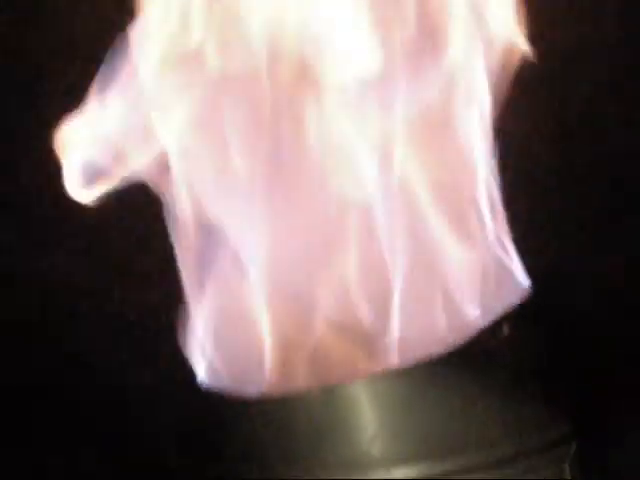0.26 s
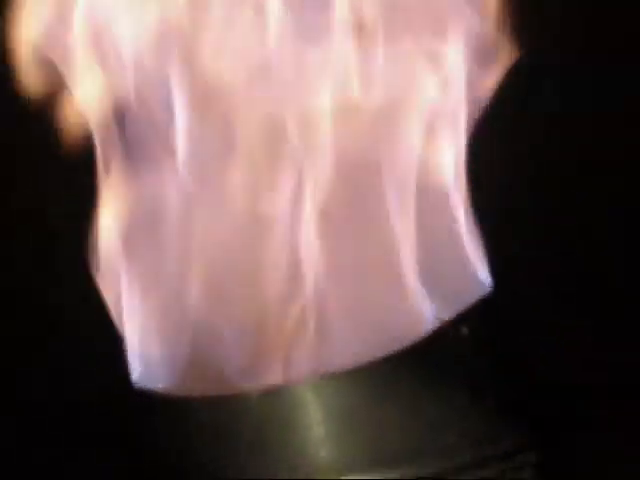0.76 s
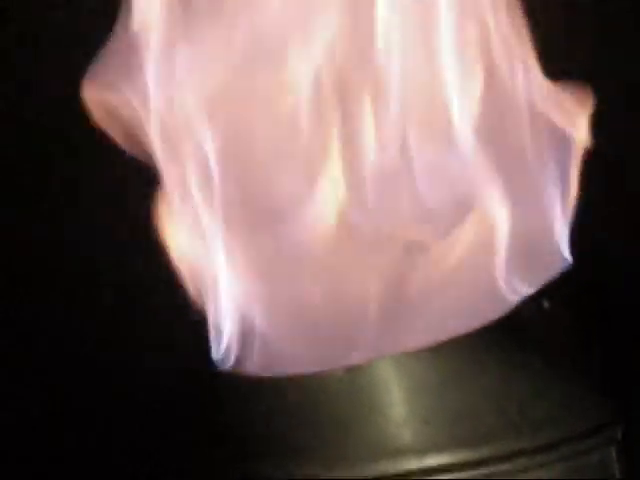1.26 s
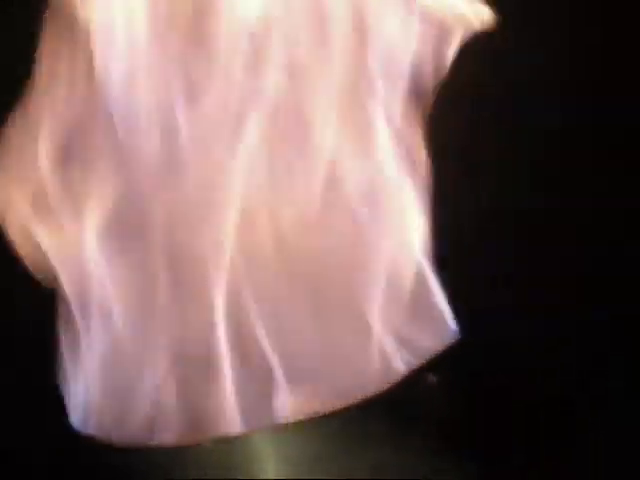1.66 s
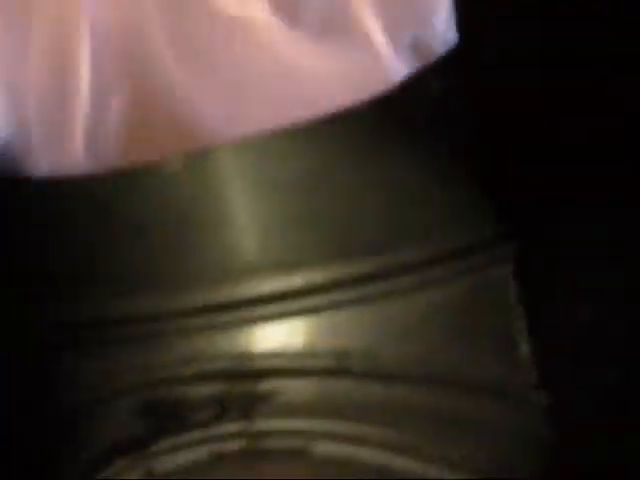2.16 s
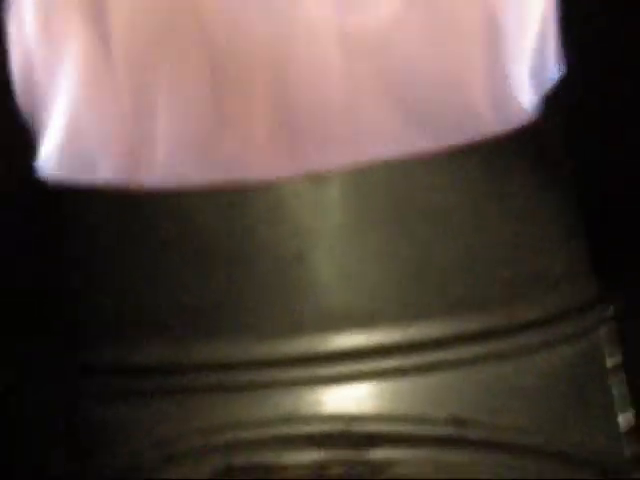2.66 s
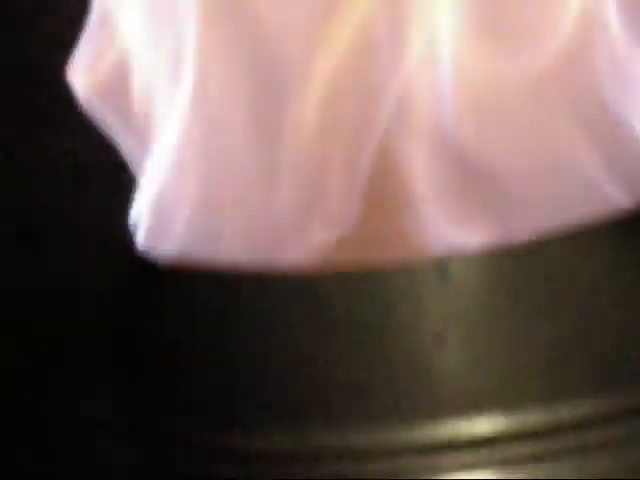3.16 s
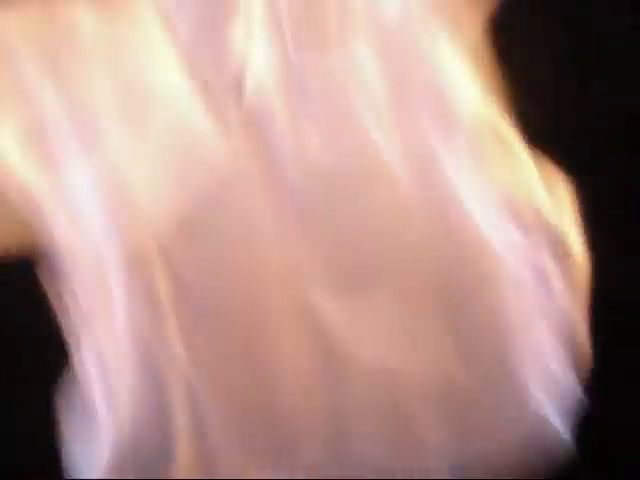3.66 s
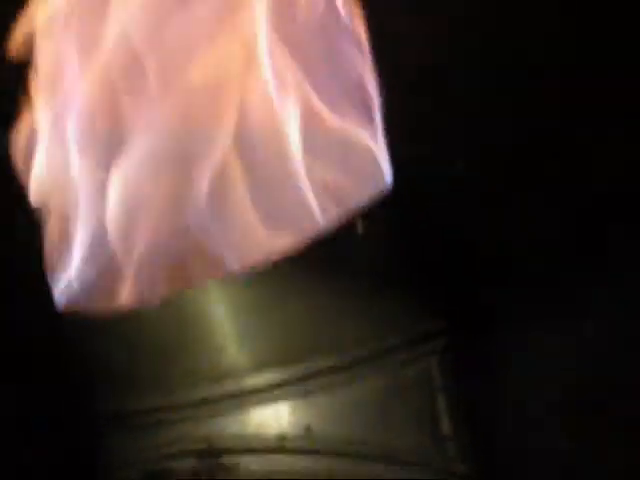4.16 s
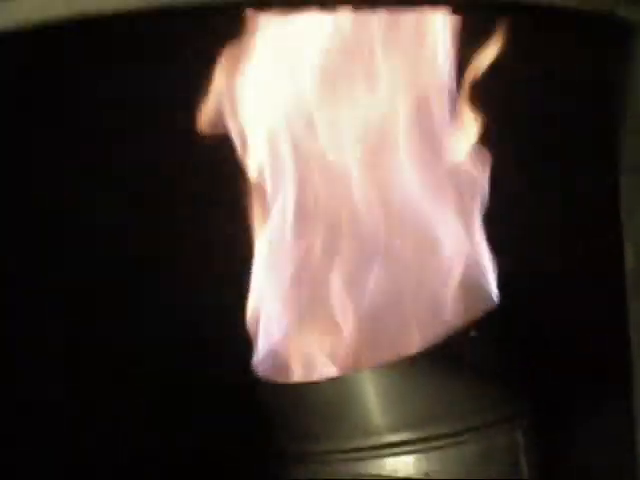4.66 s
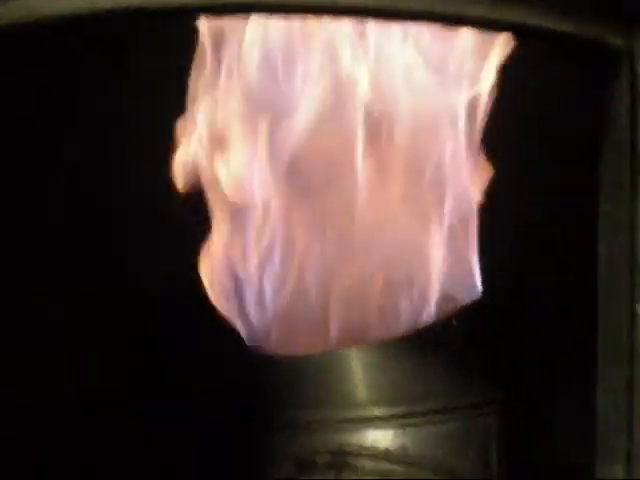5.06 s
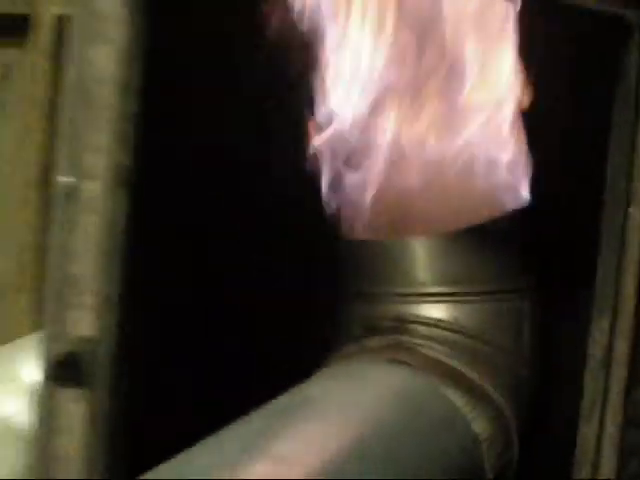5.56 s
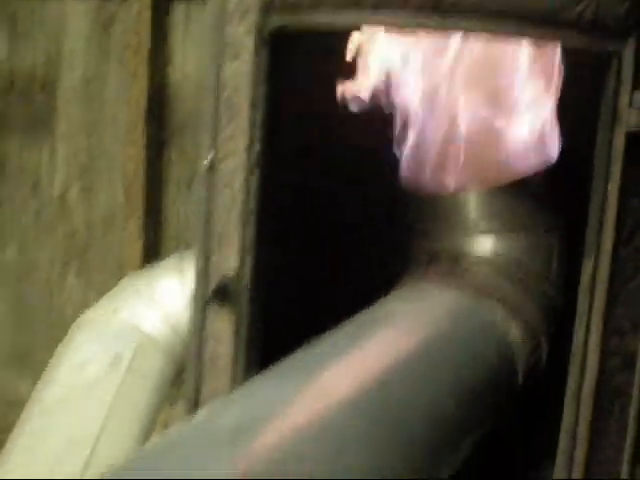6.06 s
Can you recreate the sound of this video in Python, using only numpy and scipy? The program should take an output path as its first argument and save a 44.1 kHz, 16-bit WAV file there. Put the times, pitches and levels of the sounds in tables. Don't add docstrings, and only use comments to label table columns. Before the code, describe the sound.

Inside an iron stove, a big gas flame roars unevenly at the end of a sheet-metal duct while a blower hums steadily at a low-middle pitch. A tiny squeak and a knock come early. The microphone moves close, the roar swells with puffs and a hollow howl, then backs away; the fire sinks and a burst of knocks rings out. Low-grade, grainy small-camera sound.

```python
import sys
import numpy as np
from scipy import signal
from scipy.fft import rfft, irfft, next_fast_len
from scipy.io import wavfile
from scipy.ndimage import uniform_filter1d

SR = 44100
rng = np.random.default_rng(int(sys.argv[2]) if len(sys.argv) > 2 else 0)


def amplitude_ratio(level_db):
    exponent = np.asarray(level_db, float) / 20
    return 10 ** exponent


def master_out(mix):
    frames = np.transpose(np.atleast_2d(mix))
    ceiling = np.clip(frames, -1, 1)
    pcm = np.round(ceiling * 32767).astype(np.int16)
    wavfile.write(sys.argv[1], SR, pcm)


N = 278175
T = np.arange(N) / SR

# time in seconds, flame level in dB, extra level of the facing duct mouth in dB.
FIRE = [(0, -27.5, 1.5), (.3, -25, 2.5), (.7, -23.5, 1), (1.15, -24.5, 3.5), (1.5, -24.5, 2.5),
        (1.9, -22.5, 2), (2.25, -20.5, 2), (2.55, -21.5, 0.5), (2.85, -18.5, -.5), (3.05, -21, 4),
        (3.3, -19, -2.5), (3.7, -19.5, -2.5), (4.1, -20.5, 0.5), (4.4, -23.5, -1.5), (4.65, -26, 0.5),
        (5.05, -30, 2), (5.6, -29.5, -1.5), (6.31, -34, 4)]
MEAN_FLAME_DB = -24.0


def in_time(rows):
    s, *columns = np.transpose(rows)
    return [np.interp(T, s, column) for column in columns]


def bump(s, half_s):
    return np.interp(T - s, [-half_s, 0, half_s], [0, 1, 0])


def nearness():
    near_db, _ = in_time(FIRE)
    return near_db - MEAN_FLAME_DB


def rms_one(x):
    return x / np.sqrt(np.mean(x ** 2) + 1e-20)


def evened(x, span_s):
    span = int(span_s * SR)
    power = uniform_filter1d(uniform_filter1d(x ** 2, span), span)
    return rms_one(x / np.sqrt(power))


def drift(rate_hz):
    r = np.exp(-40 * np.pi * rate_hz / SR)
    noise = rng.standard_normal(N // 20 + 4002)
    slow = signal.lfilter([1], [1, -2 * r, r * r], noise)[4000:]
    return np.interp(np.arange(N) / 20, np.arange(len(slow)), rms_one(slow - slow.mean()))


def resonance(x, hz, width_hz):
    r = np.exp(-np.pi * width_hz / SR)
    poles = [1, -2 * r * np.cos(2 * np.pi * hz / SR), r * r]
    return signal.lfilter([(1 - r * r) / 2, 0, (r * r - 1) / 2], poles, x)


def turbulence(spectrum, flicker_db, own_db):
    size = next_fast_len(N, real=True)
    hz = np.fft.rfftfreq(size, 1 / SR) + 1
    point_hz, point_db = np.transpose(spectrum)
    colour_db = np.interp(np.log(hz), np.log(point_hz), point_db, left=-80, right=-60)
    coloured = rfft(rng.standard_normal(size)) * amplitude_ratio(colour_db)
    out = 0
    for octave in np.arange(np.floor(np.log2(point_hz[0])), np.log2(point_hz[-1]) + 1):
        share = np.cos(np.pi / 2 * np.clip(np.log2(hz) - octave, -1, 1)) ** 2
        patch = irfft(coloured * share, size)[:N]
        out = out + patch * amplitude_ratio(own_db * drift(17))
    return rms_one(out * amplitude_ratio(flicker_db))


def squeak():
    # partial in Hz, level in dB.
    partials = [(3710, -45), (3790, -50), (3905, -34.5)]
    start_s = .129
    gate = np.interp(T - start_s, [0, .002, .020, .034], [0, 1, .7, 0])
    tone = 0
    for hz, db in partials:
        tone = tone + amplitude_ratio(db) * np.sqrt(2) * np.sin(2 * np.pi * (hz * T + rng.random()))
    return gate * tone


def knocks():
    # start in seconds, peak in dB, ring in Hz, decay by 60 dB in seconds, sharpness of contact.
    strikes = [(.271, -12, 790, .02, 6), (0.484, -26, 3000, .06, .5), (3.440, -27, 2800, .08, .3),
               (3.786, -24.5, 2280, 0.15, 0.39), (5.604, -14, 666.5, 0.062, 1.91),
               (5.6185, -7.5, 490, 0.028, 6), (5.625, -6.5, 962, 0.04, 3), (5.625, -15, 453, 0.037, 6.9),
               (5.626, -20, 3253, 0.03, 2.9), (5.627, -19, 2480, 0.12, 1.1), (5.643, -15, 554, 0.052, 2.3),
               (6.094, -25, 2598, .04, 2.5)]
    out, t = np.zeros(N), T[:6000]
    for s, db, hz, t60, sharp in strikes:
        swell = np.minimum(1, sharp * t / .003)
        click = sharp * (t < .0002)
        push = (rng.standard_normal(len(t)) * swell + click) * amplitude_ratio(-60 * t / t60)
        knock = resonance(resonance(push, hz, 0.41 * hz), hz, 1.0 * hz)
        at = round(s * SR)
        out[at:at + len(t)] += amplitude_ratio(db) * knock / np.max(np.abs(knock))
    return out


def fan():
    # time in seconds, blade-pass tone in Hz, its level in dB, air hiss in dB.
    course = [(0, 415.5, -32, -39), (.06, 410.3, -25, -39), (.42, 413.7, -23.5, -40),
              (1, 411.4, -22.5, -40), (1.7, 412.3, -23.5, -40), (2.1, 413.3, -22, -40.5),
              (2.4, 414.9, -22.5, -42), (2.72, 413.5, -26.5, -41), (2.87, 416.7, -23.5, -46.5),
              (3.5, 414.4, -26.5, -46.5), (3.85, 416, -28, -46.5), (4.14, 413.2, -24, -40),
              (4.6, 415.1, -26, -41), (4.95, 416.7, -28.5, -40), (5.4, 417.6, -27, -40),
              (5.88, 416.4, -25.5, -38), (6.31, 414.3, -31, -39)]
    # multiple of shaft speed, level in dB re the blade tone.
    shaft = [(4, -13), (6, -16.5), (7, -12.5), (9, -11), (13, -11.5), (17, -15), (18, -15.5), (20, -16.5),
             (23, -11.5), (25, -22.5), (27, -26), (29, -26), (31, -16), (33, -26), (50, -27)]
    # centre in seconds, depth in dB (below zero a rise), half
    # length in s.
    fades = [(0.357, 17, 0.14), (0.63, 7, .04), (0.851, 3, 0.042), (0.96, 10, 0.034), (1.7, 1.5, 0.27),
             (1.942, 12.5, 0.12), (2.099, 8, 0.039), (2.202, 14, 0.055), (2.803, 8, 0.056),
             (3.604, 7.5, 0.33), (4.05, 7.5, .3), (4.75, 5.5, 0.33), (5.2, -3, .3), (5.525, 14, .06),
             (5.75, 4.5, 0.18), (5.955, 12, 0.065)]
    # frequency in Hz, level in dB per Hz.
    air = [(500, -10), (1200, -3), (1800, -1), (2200, -2), (2700, -2.5), (3100, -8.5), (3500, -10.5),
           (3900, -12.5), (4400, -19.5)]
    blades = 10
    blade_hz, blade_db, air_db = in_time(course)
    near_db = nearness()
    fifth_db = -27.5 + .8 * near_db - sum(db * bump(s, half_s) for s, db, half_s in fades)
    eleventh_db = -36.5 + .5 * near_db - (air_db + 40.0)
    shaft_hz = uniform_filter1d(blade_hz, size=SR // 2) / blades
    turn = 2 * np.pi * np.cumsum(shaft_hz) / SR
    hum = amplitude_ratio(blade_db + 0.44 * drift(8.9)) * np.sin(blades * turn)
    hum += amplitude_ratio(fifth_db + 0.6 * drift(8)) * np.sin(blades / 2 * turn)
    hum += amplitude_ratio(eleventh_db) * np.sin((blades + 1) * turn)
    side_db = uniform_filter1d(blade_db, size=SR) + 0.22 * uniform_filter1d(near_db, size=SR)
    for multiple, db in shaft:
        through_duct_db = .6 * near_db if multiple < blades / 2 else 0
        order_db = db + side_db + through_duct_db + 2.5 * drift(3)
        hum += amplitude_ratio(order_db) * np.sin(multiple * turn + rng.uniform(0, 2 * np.pi))
    hiss = turbulence(air, 0.53 * drift(22), own_db=1.25)
    return np.sqrt(2) * hum + amplitude_ratio(air_db + 3.5) * hiss


def eddies(hz):
    # centre in seconds, level change in dB, pitch in Hz.
    level_changes = [(.33, 2, 900), (.66, 3.5, 800), (.86, 6.5, 750), (1.16, 5.5, 900), (1.61, 6.5, 454.7),
                     (1.81, 3, 221), (1.92, 8, 396), (2.23, 5, 700), (2.41, 5, 970), (2.48, 5, 250),
                     (2.63, 7.5, 899.6), (2.701, 1, 600), (2.80, 4, 600), (3.11, 5, 230), (3.46, 8.5, 800),
                     (3.55, 9, 350), (3.72, 4.5, 550), (3.91, 6, 714.4), (4.08, -0.5, 906), (4.25, 6.5, 749.2),
                     (5.619, 2, 600), (2.30, 5, 1300), (2.55, 6.5, 1400), (2.90, 1.5, 1300), (4.03, 6.5, 1510),
                     (4.16, -1.5, 700), (5.33, 4, 1280), (5.95, 4, 1199), (3.39, 1, 220.2), (1.30, 3, 230),
                     (.49, -2.5, 950), (.82, -7.5, 800), (1.47, -8, 441), (1.58, -4, 950), (1.76, -12, 250),
             (1.85, -6, 240), (1.88, -8, 1130), (1.97, -9, 400), (2.34, -2, 450), (2.60, -9, 600),
             (2.75, -5, 660), (3.13, -5, 800), (3.41, -6.5, 800), (3.49, -9, 800), (3.619, -6, 857),
             (3.96, -9.5, 744), (4.31, -4, 550), (4.66, -3, 953), (5.09, -1, 230), (5.43, -1, 949),
             (5.50, -13, 300), (.90, -0.5, 1300), (2.93, -4, 303), (3.35, -8, 1100), (5.62, -1, 199.8),
             (.28, -3, 200), (3.68, -1, 550), (6.22, -4, 950), (4.55, -1.5, 1000), (5.78, -0.5, 951)]
    half_s, reach_octaves = .045, 1
    change_db = 0
    for s, db, at_hz in level_changes:
        share = max(0, 1 - abs(np.log2(at_hz / hz)) / reach_octaves)
        change_db = change_db + db * share * bump(s, half_s)
    return change_db


def fire():
    # frequency in Hz, level in dB per Hz.
    rumble_colour = [(25, -45.5), (60, -34.5), (90, -16.5), (130, -3.5), (200, -2), (290, 1), (350, -4),
                     (430, -9.5), (600, -30)]
    # frequency in Hz, level in dB per Hz.
    roar_colour = [(300, -27.5), (420, -9.5), (500, -1.5), (590, 1), (650, -5), (750, -4), (800, -9.5),
                   (900, -21.5), (1200, -34)]
    # pitch in Hz, width in Hz, level in dB.
    duct_mouth = [(867.8, 37, -1.5), (915.1, 46, 2.5), (950.4, 55, -3.5)]
    # frequency in Hz, level in dB per Hz.
    rush_colour = [(300, -8), (800, -4), (1000, -5.5), (1060, -2), (1150, -1.5), (1400, -4), (1550, -7.5),
                   (1750, -13), (2200, -30.5)]
    # start in seconds, peak in dB.
    puffs = [(0.36, -8), (0.39, -11.5), (1.613, 1), (2.257, -7), (2.364, -11), (2.63, -14), (2.782, -10),
             (2.998, -9), (3.331, -6.5), (3.915, -15.5), (4.25, -12)]
    near_db, (_, facing_db) = nearness(), in_time(FIRE)
    rumble_db = -25 + 0.97 * near_db + eddies(hz=230)
    roar_db = -22 + near_db + eddies(hz=600)
    howl_db = -25.5 + near_db + facing_db + eddies(hz=900)
    rush_db = -29.5 + .4 * near_db + 0.11 * facing_db + eddies(hz=1400)

    flicker_db = .5 * drift(10) + 0.88 * drift(30)
    for s, db in puffs:
        puff = np.interp(T - s, [-0.026, -0.0078, .001, 0.015], [0, -1, 1, 0])
        flicker_db += (db + 23.5) * .3 * puff

    rumble = turbulence(rumble_colour, .8 * flicker_db, own_db=-0.33)
    roar = turbulence(roar_colour, 1.3 * flicker_db, own_db=-1.35)
    gas = rng.standard_normal(N) * amplitude_ratio(1.5 * flicker_db)
    howl = 0
    for hz, width_hz, db in duct_mouth:
        ring = resonance(resonance(gas, hz, 1.5 * width_hz), hz, 1.5 * width_hz)
        howl = howl + amplitude_ratio(db) * ring
    rush = turbulence(rush_colour, 1.3 * flicker_db, own_db=1.34)

    low = amplitude_ratio(rumble_db) * evened(rumble, .09) + amplitude_ratio(roar_db) * evened(roar, .07)
    return low + amplitude_ratio(howl_db) * evened(howl, 0.077) + amplitude_ratio(rush_db) * evened(rush, 0.088)


def stove(x):
    # centre in Hz, width in Hz, depth from 0 to 1.
    dips = [(335.6, 43, 0.2), (433, 25, .5), (481, 15, 0.2), (728, 20, .4), (800, 41, .6), (1062, 48, .5)]
    near = np.interp(T, [4.3, 5.2], [1, .45])
    for hz, width_hz, depth in dips:
        x = x - near * depth * resonance(x, hz, width_hz)
    return x


def scene():
    mix = squeak() + knocks() + fan() + stove(fire())
    return mix[None]


def band_limit(x):
    return signal.sosfilt(signal.butter(12, 15680, fs=SR, output="sos"), x)


def record(dry):
    sample_hz, steps = 8000, 128
    x = signal.sosfilt(signal.cheby2(8, 40, 5000, fs=SR, output="sos"), dry)
    held = (np.floor(T * sample_hz) * SR / sample_hz).astype(int)
    rounded = 0.92 * np.tanh(x[:, held] / 0.97)
    x = np.floor(rounded * steps) / steps
    x = signal.sosfilt(signal.ellip(12, .1, 70, 15420, fs=SR, output="sos"), x)
    return band_limit(x)


dry = scene()
out = record(dry)
master_out(out)
```